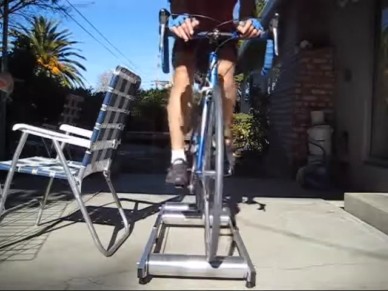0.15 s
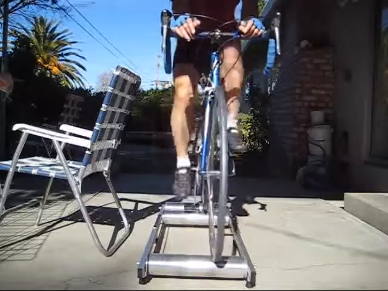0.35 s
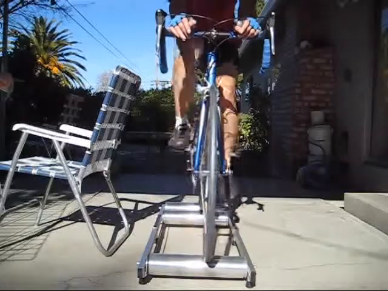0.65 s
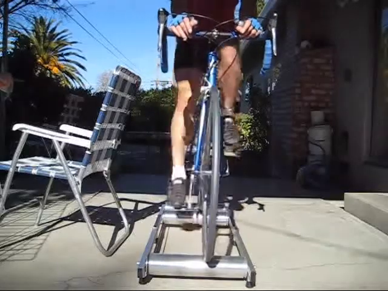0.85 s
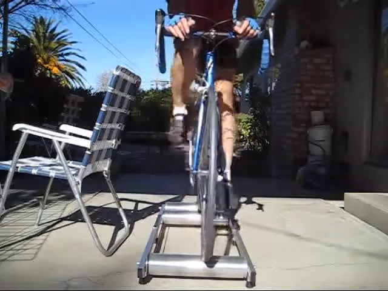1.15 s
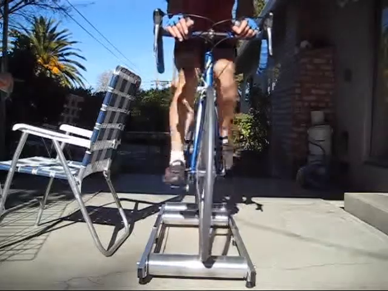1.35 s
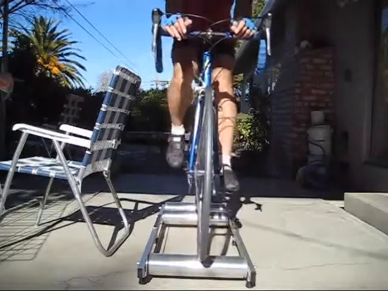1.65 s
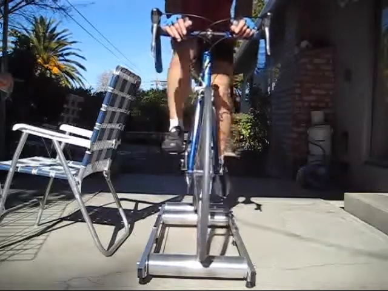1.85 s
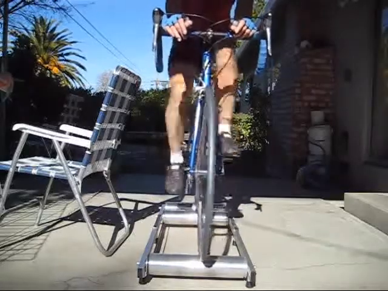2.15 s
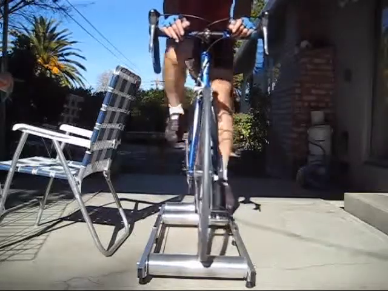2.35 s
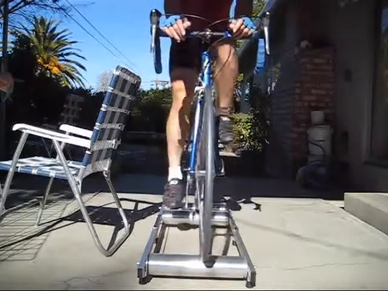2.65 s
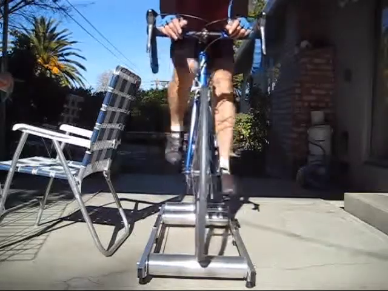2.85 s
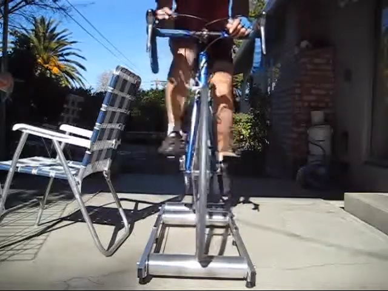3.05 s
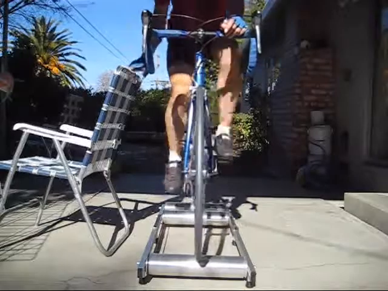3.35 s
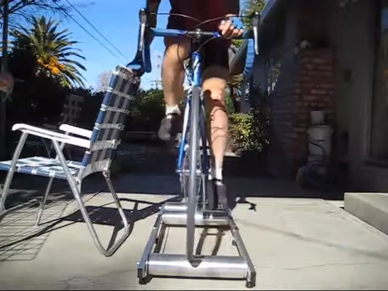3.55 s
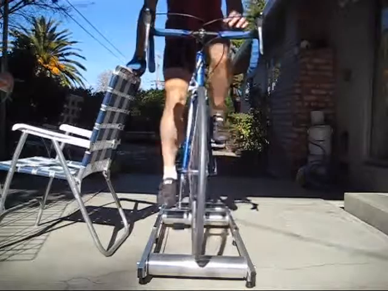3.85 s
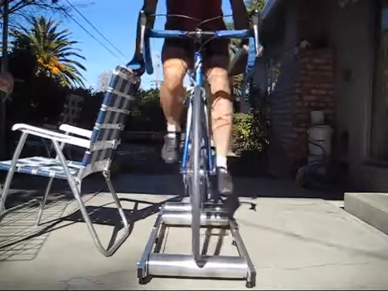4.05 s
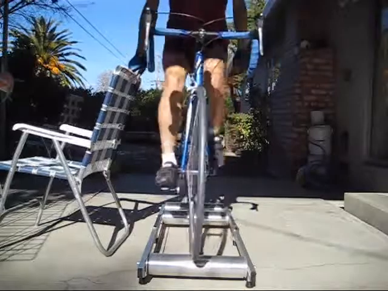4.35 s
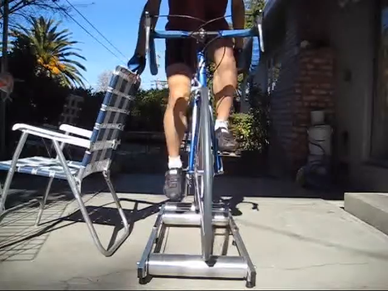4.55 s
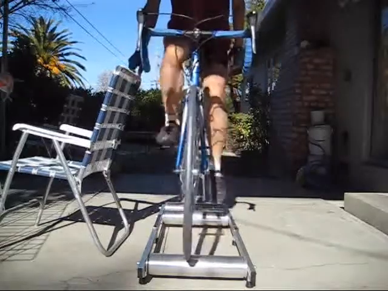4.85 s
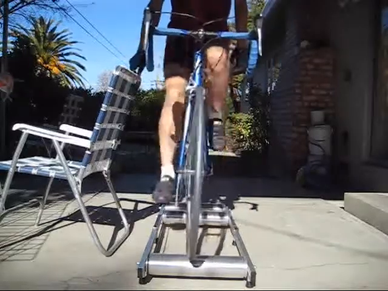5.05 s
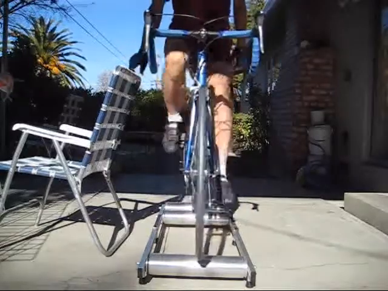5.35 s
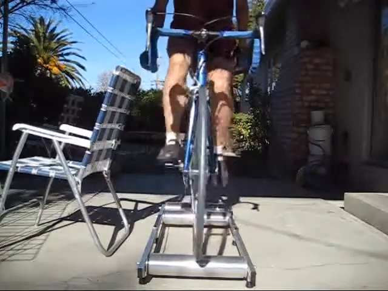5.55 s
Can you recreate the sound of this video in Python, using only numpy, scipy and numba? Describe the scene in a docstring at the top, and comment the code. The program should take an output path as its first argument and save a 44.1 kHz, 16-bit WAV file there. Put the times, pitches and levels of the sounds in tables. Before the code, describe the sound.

Steady hissing tyres and ringing roller drums under a high bearing whine, chain clicking busily, with a couple of hard snaps and light scuffs.

```python
"""A bicycle spins on three aluminium roller drums on a concrete patio, a few metres from a small microphone.
From the start the tyres hiss as shaped noise and the drum tubes sing as narrow resonances shaken by noise; a
high bearing whine, noise in a moving band, sinks in pitch. Short wobbly tones make the chain tick; near 0.2 s a
noise burst snaps and echoes off the patio. Wind thumps the microphone from 1.2 s as soft puffs of low noise.
From 3.5 s the frame scuffs in puffs of mostly higher noise, and a second snap comes at 3.8 s."""
import sys
import numpy as np
from scipy import signal
from scipy.fft import rfft, irfft
from scipy.io import wavfile
from scipy.ndimage import uniform_filter1d
from numba import njit

SR = 44100
rng = np.random.default_rng(int(sys.argv[2]) if len(sys.argv) > 2 else 0)


def dump_mix(stems):
    """Bounce the given channels to the path in sys.argv[1] as a 16-bit WAV at rate SR."""
    frames = np.atleast_2d(stems).T  # one column per channel
    limited = np.clip(frames, -1, 1)  # hard clip at full scale
    pcm = np.round(limited * 32767).astype(np.int16)
    wavfile.write(sys.argv[1], SR, pcm)


N = 251370  # length in samples, 5.7 s

# Slow drift of tyres and drums. Each row: time in seconds, level change in dB.
DRIFT = [(0, 0), (.7, -0.05), (1.6, 0.33), (2.6, 0.4), (3.6, -0.05), (4.6, -.8), (5.7, -1.4)]
# Rolling pressure of the tyres; only its ups and downs are heard. Each row: time in seconds, level in dB.
PRESSURE = [(0.0, -30), (0.13, -32), (0.32, -32), (1.24, -32), (1.43, -31), (1.9, -32), (3.06, -31.5),
            (5.3, -32), (5.46, -30.5), (5.7, -31.5)]
# Colour of the rolling hiss. Each row: frequency in Hz, relative level in dB per Hz.
HISS_COLOUR = [(15, -40), (30, -21.5), (60, -13.5), (190, -13), (260, -18), (600, -13), (1000, -12),
               (1800, -11), (2600, -10.5), (3250, -8), (4600, -8), (6200, -14.5), (10500, -12.5),
               (13450, -15), (13650, -20), (14400, -19), (15300, -46)]

# Pitches of the drum tube resonances, by family. Each entry: pitch in Hz.
HUM_HZ = [1276]
LOW_HZ = [612, 929, 975, 1110, 1202, 1533, 2040, 2225, 2335]
MAIN_HZ = [2901, 2949]
TWIN_HZ = [3074, 3121, 3030, 3200]
MID_HZ = [3820, 3900, 4001, 4040, 4168]
UPPER_HZ = [5478, 5567, 5738, 5815, 6120, 6180, 6448]
TOP_MODE_HZ = [8662, 8921, 9235, 9355, 12325, 12838, 13040, 13260, 13315, 13455]
# The same resonances in the same order. Each row: width in Hz, level within the family in dB.
HUM_MODES = [(24, 0.0042)]
LOW_MODES = [(44.8, -8.5), (19.3, -10), (34.5, -9), (39, -9.5), (17.9, -6.5), (27.5, -8.5), (40, -11.5),
             (30, -10), (79.5, -10)]
MAIN_MODES = [(12, 2), (12, -3.5)]
TWIN_MODES = [(15, 0.5), (26, -3.5), (40, -15.5), (120, -11.5)]
MID_MODES = [(60, -6.5), (13.1, -1), (18.1, -2.5), (22, -13), (40, -3.5)]
UPPER_MODES = [(21.7, 2.5), (20, -2), (25, -6.5), (18, -6.5), (14, -13.5), (14, -20), (20, -9)]
TOP_MODES = [(16, -43), (26, -38), (20, -42), (25, -46), (12, -51), (20, -43), (18, -46), (20, -50),
             (20, -48), (22, -48)]
# Base level of the resonances near 4 kHz. Each row: time in seconds, level in dB.
MID_RING = [(0, -29), (.2, -36), (.32, -38), (.6, -50), (.85, -36), (1.2, -40), (1.45, -34.5), (3.2, -33.5),
            (4.0, -33), (4.3, -37.5), (5.7, -33)]
# Brief random rises in level of the ringing tones. Each row: middle in seconds, tone in Hz, rise in dB,
# length (spread of the bell-shaped rise) in seconds.
LEVEL_RISES = [(.05, 3074, 4, .06), (.39, 1276, 5.5, .03), (.95, 2901, 6, 0.032), (1.593, 2901, 5.5, 0.058),
               (1.837, 3074, 8.5, 0.047), (2.33, 1276, 4, .04), (2.445, 3074, 5, 0.036),
               (2.997, 2901, 6.5, 0.094), (3.65, 1276, 4, 0.029), (4.095, 3074, 5.5, .05),
               (4.205, 1276, 10.5, 0.023), (4.63, 2901, 6, 0.039), (4.867, 3074, 2.5, 0.024),
               (4.87, 2901, 5, 0.036), (5.026, 1276, 7.5, 0.04), (5.345, 1276, 9.5, .03),
               (5.555, 1276, 5, .05)]

# Path of the bearing whine. Each row: time in seconds, centre in Hz, level before trims in dB.
WHINE_PATH = [(0, 10600, -33), (.3, 10370, -31), (.58, 10400, -32), (.75, 10400, -37), (1.3, 10450, -32),
              (1.6, 10400, -31), (2.2, 10600, -30), (3.1, 10450, -29.5), (3.3, 10440, -26.5),
              (3.45, 10400, -30.5), (4.2, 10380, -30), (4.33, 10000, -28.5), (4.8, 10140, -31),
              (4.87, 9900, -29), (5.1, 10000, -33), (5.5, 9800, -29), (5.7, 9850, -29)]
# Resonances that sing as the whine passes over them. Each entry: pitch in Hz.
WHINE_HZ = [9676, 9810, 9860, 9960, 10120, 10430, 10580, 10762]
# Those resonances in the same order. Each row: width in Hz, level within the family in dB.
WHINE_MODES = [(15, 8.5), (27, -14), (15, -9), (12, 1), (20.6, -15), (40, 1), (16.2, -13), (25, 2)]

# Loud chain ticks. Each row: start in seconds, relative level in dB, pitch in Hz.
TICKS = [(.115, -12, 4630), (.320, -12, 4800), (.414, -11.5, 3670), (.893, -12, 4600), (.990, -15, 7700),
         (1.233, -12, 4600), (1.460, -13, 4750), (1.952, -14, 4640), (2.176, -12, 4970), (2.319, -11, 4360),
         (2.392, -13, 4530), (2.444, -11, 4600), (2.915, -11, 4640), (3.255, -12, 4470), (3.524, -12, 4400),
         (3.975, -9, 3670), (4.471, -12, 4560), (4.474, -13, 4580), (4.484, -12, 4540), (4.799, -11, 10500),
         (5.035, -13, 4970), (5.0405, -13, 4860), (5.101, -15, 10800), (5.116, -19, 7600),
         (5.239, -11, 3620)]
# Pitches that the faint chain ticks choose from. Each entry: pitch before random detuning in Hz.
FAINT_TICK_HZ = [3600, 4200, 4600, 4600, 4700, 5100, 7500]
# Sharp snaps. Each row: start in seconds, peak in dB, centre in Hz, crack against body in dB.
SNAPS = [(.2303, -1.5, 4000, -5), (3.8228, -3.5, 3900, 2)]
# Wind on the microphone. Each row: middle in seconds, level in dB, centre in Hz, length in seconds,
# width of each filter as a share of the centre.
GUSTS = [(1.2, -37, 110, .008, .85), (1.25, -34, 70, .02, 0.92), (1.285, -32, 140, 0.013, 1.1),
         (1.338, -32, 130, .009, 1.1), (1.376, -24, 164, 0.0076, .6), (1.383, -31.5, 300, .006, .6),
         (1.387, -34, 60, .007, .85)]
# Scuffs and rattles through the frame. Each row: middle in seconds, level in dB, centre in Hz,
# length in seconds, width of each filter as a share of the centre.
SCUFFS = [(3.534, -23, 1200, 0.024, 1.5), (3.89, -30, 2100, 0.027, 1.1), (4.48, -22.5, 4570, 0.016, .45),
          (5.06, -29, 4900, .022, 0.32), (5.11, -29.5, 1040, 0.038, 1.8), (5.115, -33, 7992, .01, .3),
          (3.826, -21, 4500, 0.0076, 0.88)]

# Base levels of the drum families in dB
HUM_DB, LOW_DB, MAIN_DB, TWIN_DB, UPPER_DB, TOP_DB = -34, -34, -33.5, -30, -35, 1
# Pedal strokes swell the treble; each wheel turn presses the drums once and, out of round, twice.
# Rates in Hz, with the time of one peak in seconds
STROKE_HZ, STROKE_PEAK_S = 3.33, 0.29
WHEEL_HZ, WHEEL_PEAK_S = 4.6, 0.07
# Faint ticks: lowest level and random span in dB before the clatter beat
FAINT_TICK_DB, FAINT_SPAN_DB = -29.5, 10
CLATTER_HZ, CLATTER_PEAK_S, CLATTER_DB = 6.63, 0.076, 4.5  # louder about twice a stroke
ECHO_S, ECHO_DB = .0057, -3.5  # delay and level of the echo off the ground after a snap
TOP_HZ = 15100  # upper edge of the sound


def undb(db):
    """Turn decibels into a gain."""
    return 10 ** (np.asarray(db) / 20)


def unit(x):
    """Scale a signal to an average strength (rms) of 1."""
    return x / np.sqrt(np.mean(x ** 2))


def curves(table):
    """Draw straight lines between table rows: one value per sample for each column after the time."""
    seconds, *columns = np.transpose(table)
    return [np.interp(np.arange(N) / SR, seconds, column) for column in columns]


def turn(hz, peak_s):
    """A smooth wave for something that turns, 1 at the peak time and -1 half a turn later."""
    return np.cos(2 * np.pi * hz * (np.arange(N) / SR - peak_s))


def walk(rate):
    """Random levels, each held for 1 / rate seconds, then smoothed twice; rms 1."""
    hold = int(SR / rate)
    steps = np.repeat(rng.standard_normal(N // hold + 1), hold)
    smooth = uniform_filter1d(uniform_filter1d(steps, hold), hold)
    return unit(smooth[:N])


def grit(spread_db):
    """Noise whose strength jumps every 32 samples, like grains under a tyre."""
    size = undb(spread_db * rng.exponential(size=N // 32 + 1))
    return unit(rng.standard_normal(N) * np.repeat(size, 32)[:N])


def band(x, hz, width):
    """Keep only a band of sound round one fixed pitch."""
    return signal.lfilter(*signal.iirpeak(hz, hz / width, SR), x)


@njit
def moving_band(x, hz, width):
    """Keep a band whose centre moves (a state-variable filter), with gain 1 at the centre."""
    y, b, l = np.empty(len(x)), 0., 0.
    for i in range(len(x)):
        g, k = np.tan(np.pi * hz[i] / SR), width / hz[i]
        v = (b + g * (x[i] - l)) / (1 + g * (g + k))
        b, l, y[i] = 2 * v - b, l + 2 * g * v, k * v
    return y


def mode(x, hz, width):
    """One resonance as a complex one-pole filter: a narrower one rings longer; gain 1 at its pitch."""
    radius = np.exp(-np.pi * width / SR)
    return signal.lfilter([1 - radius], [1, -radius * np.exp(2j * np.pi * hz / SR)], x)


def ring(level_db, pitches, modes, steady):
    """Resonances shaken by noise, which makes them beat; steady, from 0 to 1, evens the beating out."""
    out = 0
    for hz, (width, db) in zip(pitches, modes):
        tone = mode(rng.standard_normal(N), hz, width)
        tone = tone / (np.abs(tone) + 1e-9) ** np.clip(steady, 0, 1)
        tone = undb(level_db) * tone / np.std(tone.imag)
        # A wider second resonance limits how fast the level can change
        out = out + undb(db) * mode(tone, hz, 4.1 * width).imag
    return out


def level_rises(pitches):
    """Soft-edged rises in dB, taken from the rows whose tone lies close to one of the pitches."""
    t = np.arange(N) / SR
    rise_db = 0
    for s, hz, db, length in LEVEL_RISES:
        distance = np.min(np.abs(np.log(np.array(pitches) / hz)))
        if distance < .02:
            rise_db = rise_db + db * np.exp(-.5 * ((t - s) / length) ** 2)
    return rise_db


def puffs(table):
    """Soft-edged bursts of noise, each filtered twice round its centre."""
    out, t = 0, np.arange(N) / SR
    for s, db, hz, length, spread in table:
        width = spread * hz
        noise = band(band(grit(1.3), hz, width), hz, width)
        burst = noise * np.exp(-.5 * ((t - s) / length) ** 2)
        strength = np.sqrt(np.sum(burst ** 2) / (length * SR * np.sqrt(np.pi)))
        out = out + undb(db) * burst / strength
    return out


def hiss(level_db):
    """Rolling tyres and air in the spokes: noise bands flicker separately; higher ones follow the roll more."""
    hz = np.fft.rfftfreq(N, 1 / SR) + 1e-3
    table_hz, table_db = np.array(HISS_COLOUR).T
    colour = undb(np.interp(np.log(hz), np.log(table_hz), table_db))
    spectrum, out = rfft(grit(1.0)) * colour, 0
    # Overlapping bands half an octave apart; the centre is a power of two, in Hz
    for centre in np.arange(4, 15, .5):
        share = np.clip(1 - 2 * np.abs(np.log2(hz) - centre), 0, 1)
        follow = np.clip((centre - 8.5) / 4, 0, 1)
        band_db = follow * (level_db - level_db.mean()) + 1.53 * walk(7.9)
        out = out + irfft(spectrum * share, N) * undb(band_db)
    return undb(-24.5) * unit(out)


def drums():
    """Tyres and bearings shake the tubes: families of resonances flutter, and some pulse or briefly rise."""
    once, twice = turn(WHEEL_HZ, WHEEL_PEAK_S), turn(2 * WHEEL_HZ, WHEEL_PEAK_S)
    stroke = turn(STROKE_HZ, STROKE_PEAK_S)
    hum_db = HUM_DB + level_rises(HUM_HZ) + 1.7 * walk(12.)
    low_db = LOW_DB + 2.5 * walk(3.9)
    main_db = MAIN_DB + level_rises(MAIN_HZ[:1]) + 1.15 * once + 2.3 * twice + 1.55 * walk(24.03)
    twin_db = TWIN_DB + level_rises(TWIN_HZ[:1]) + 0.35 * once + 1.7 * walk(24.03)
    mid_db = curves(MID_RING)[0] + 1.5 * walk(13.)
    upper_db = UPPER_DB + 0.27 * twice + 1.4 * walk(13.)
    top_db = TOP_DB + 0.33 * stroke + 2.0 * walk(15.)
    out = ring(hum_db, HUM_HZ, HUM_MODES, 0.27)
    out += ring(low_db, LOW_HZ, LOW_MODES, 0.068)
    out += ring(main_db, MAIN_HZ, MAIN_MODES, 0.57)
    out += ring(twin_db, TWIN_HZ, TWIN_MODES, 0.24)
    out += ring(mid_db, MID_HZ, MID_MODES, 0.28)
    out += ring(upper_db, UPPER_HZ, UPPER_MODES, 0.2)
    return out + ring(top_db, TOP_MODE_HZ, TOP_MODES, 0.052)


def whine():
    """Bearing whine: noise in a moving band plus nearby resonances; it sputters and leans on each stroke."""
    hz, level_db = curves(WHINE_PATH)
    level_db = level_db + 0.37 * turn(STROKE_HZ, STROKE_PEAK_S) + 1.9 * walk(30.)
    broad = moving_band(moving_band(grit(1.3), hz, 600.0), hz, 600.0)
    out = undb(level_db - 4) * unit(broad)
    for pitch, row in zip(WHINE_HZ, WHINE_MODES):
        away_db = -4.3 * ((pitch - hz) / 220) ** 2  # fades as the whine moves away
        out = out + ring(level_db - 5.5 + away_db, [pitch], [row], .3)
    return out


def faint_ticks():
    """Pick 600 faint chain ticks at random: start, level and pitch, louder on the clatter beat."""
    chance = rng.random((600, 4))
    start = chance[:, 0] * N / SR
    beat = np.cos(2 * np.pi * CLATTER_HZ * (start - CLATTER_PEAK_S))
    level_db = FAINT_TICK_DB + FAINT_SPAN_DB * chance[:, 1] + CLATTER_DB * beat
    choice = (chance[:, 3] * len(FAINT_TICK_HZ)).astype(int)
    pitch = np.array(FAINT_TICK_HZ)[choice] * (1 + .18 * (chance[:, 2] - .5))
    return np.c_[start, level_db, pitch]


def ticks():
    """Chain links seat on the teeth: tones of a few milliseconds, made rough by a wandering phase."""
    out, t = np.zeros(N + 600), np.arange(600) / SR
    # A fast part and a slower tail, peaking at 0.6 and 1.6 ms
    fast = .55 * t / .0006 * np.exp(1 - t / .0006)
    slow = .25 * t / .0016 * np.exp(1 - t / .0016)
    for s, db, hz in [*TICKS, *faint_ticks()]:
        wander = np.cumsum(.22 * rng.standard_normal(len(t)))
        tone = np.sin(2 * np.pi * hz * t + wander)
        out[int(s * SR):][:len(t)] += undb(db) * (fast + slow) * tone
    return out[:N]


def snaps():
    """Fading noise makes a short ring with a bright crack, then a softer copy as it echoes off the ground."""
    out, t = np.zeros(N), np.arange(1000) / SR
    noise = rng.standard_normal((len(SNAPS), 2, 2, len(t)))
    for (s, db, hz, crack_db), pair in zip(SNAPS, noise):
        for echo, (body_noise, crack_noise) in enumerate(pair):
            body = band(band(body_noise * np.exp(-t / .0018), hz, 3400), hz, 3400)
            crack = band(band(crack_noise * np.exp(-t / .0011), 9500, 8000), 9500, 8000)
            hit = body / np.abs(body).max() + undb(crack_db) * crack / np.abs(crack).max()
            hit = hit / np.abs(hit).max()
            start = int((s + echo * ECHO_S) * SR)
            out[start:][:len(t)] += undb(db + echo * ECHO_DB) * hit
    return out


def wind():
    """Wind pushes on the microphone: low thumps made of short noise puffs."""
    return puffs(GUSTS)


def scuffs():
    """Scuffs and rattles through the frame: short noise puffs, each round its own pitch."""
    return puffs(SCUFFS)


def scene():
    """Add all the sounds at one microphone, which feeds both channels."""
    pressure_db = curves(PRESSURE)[0] + 0.53 * turn(STROKE_HZ, STROKE_PEAK_S)
    rolling = undb(curves(DRIFT)[0]) * (hiss(pressure_db) + drums())
    mono = rolling + whine() + ticks() + snaps() + wind() + scuffs()
    return np.array([mono, mono])


def record(dry):
    """A steep low-pass filter removes the treble above TOP_HZ."""
    low_pass = signal.ellip(10, .2, 80, TOP_HZ, fs=SR, output="sos")
    return signal.sosfilt(low_pass, dry)


dry = scene()
out = record(dry)
dump_mix(out)
```